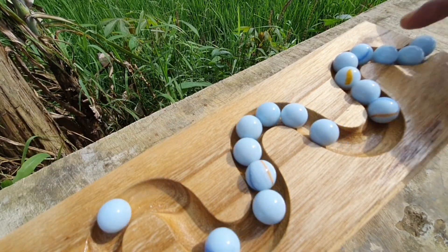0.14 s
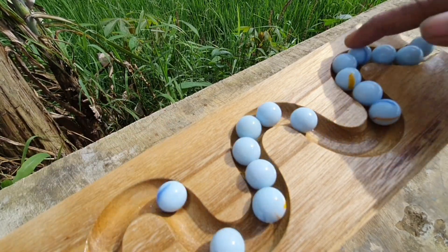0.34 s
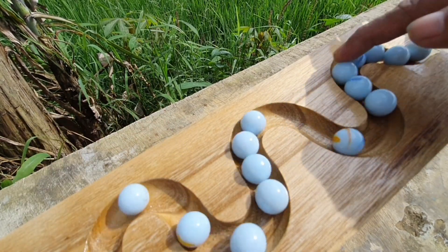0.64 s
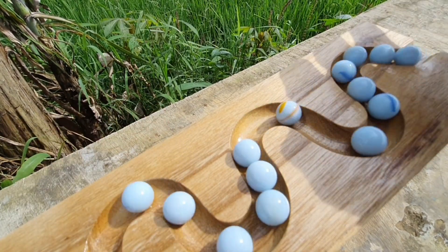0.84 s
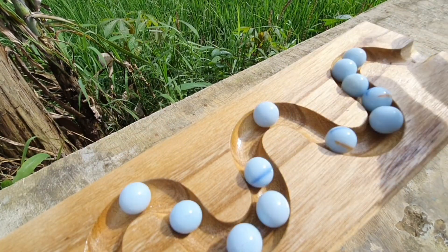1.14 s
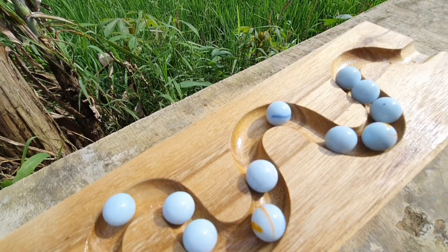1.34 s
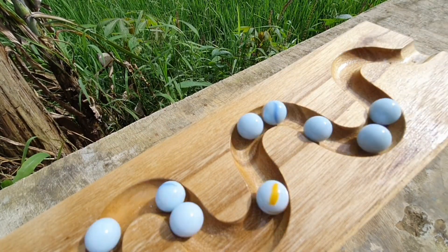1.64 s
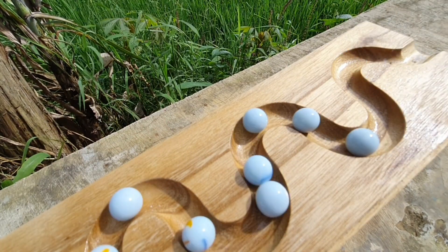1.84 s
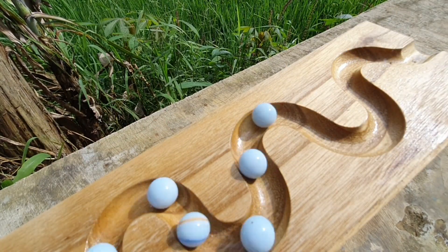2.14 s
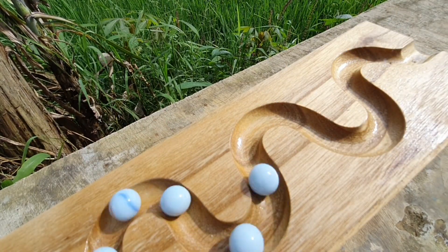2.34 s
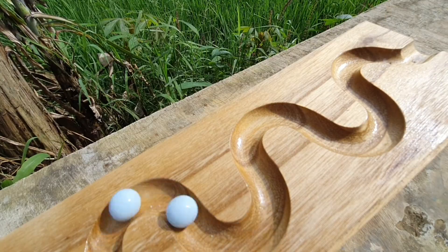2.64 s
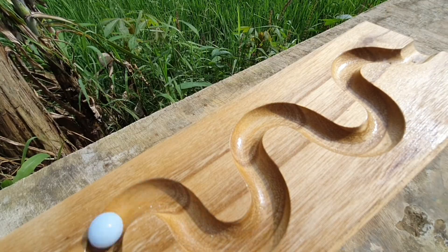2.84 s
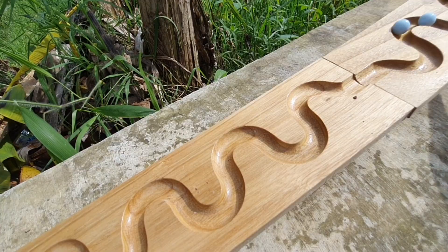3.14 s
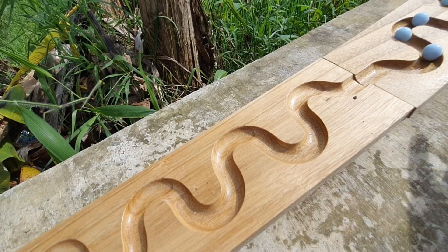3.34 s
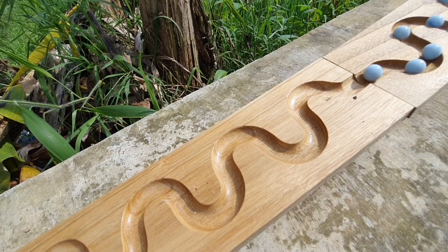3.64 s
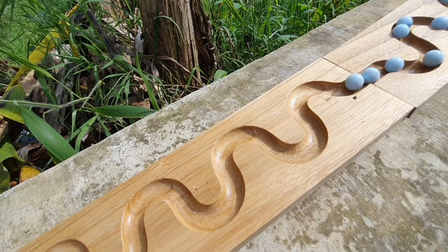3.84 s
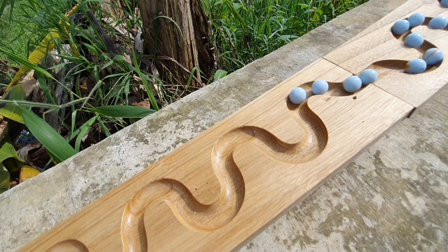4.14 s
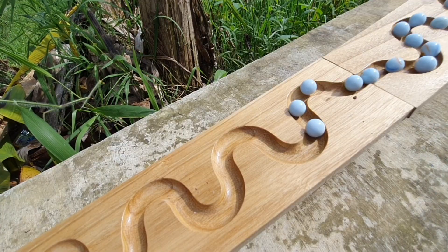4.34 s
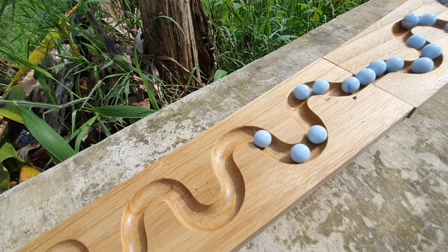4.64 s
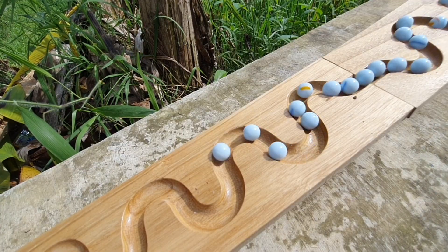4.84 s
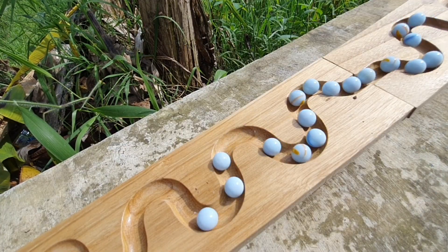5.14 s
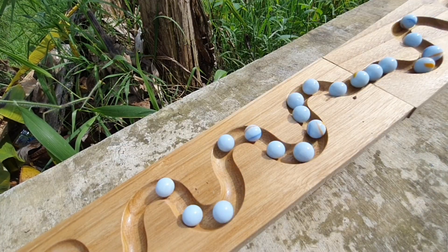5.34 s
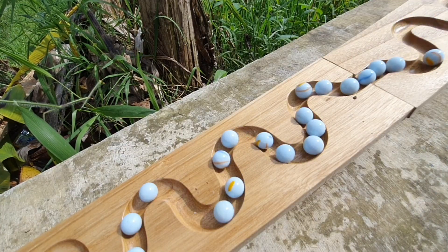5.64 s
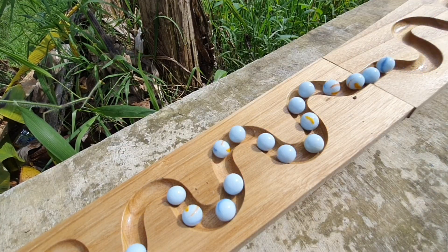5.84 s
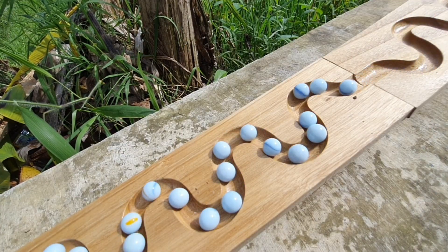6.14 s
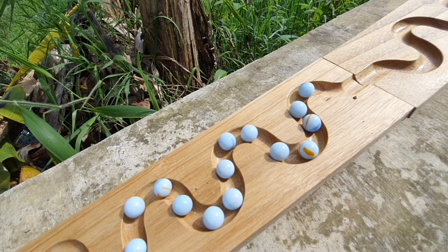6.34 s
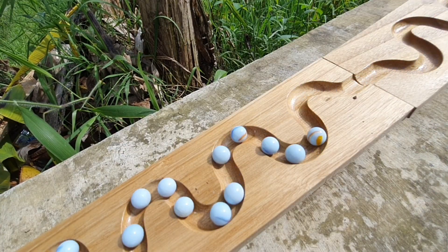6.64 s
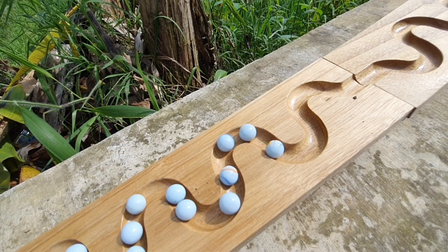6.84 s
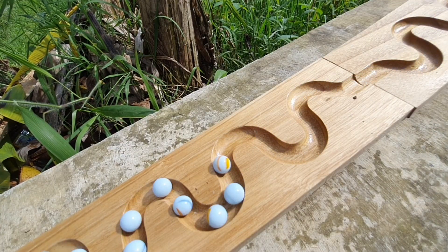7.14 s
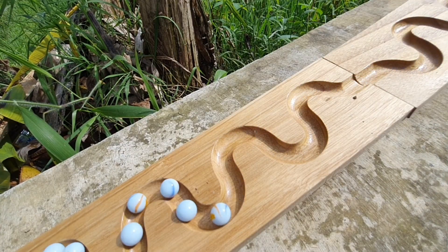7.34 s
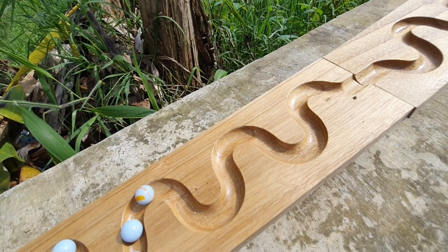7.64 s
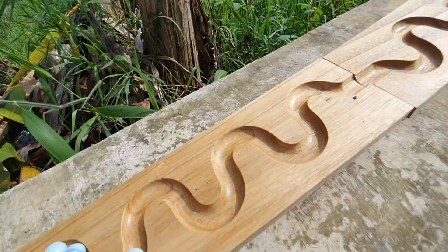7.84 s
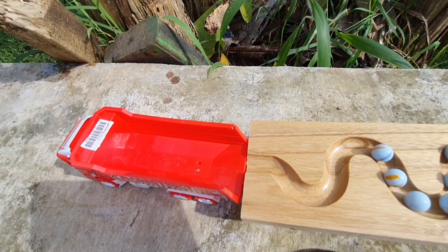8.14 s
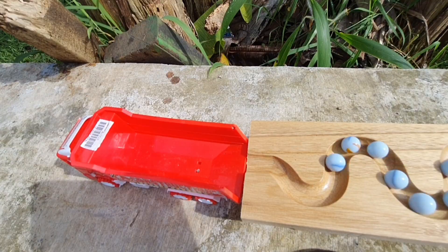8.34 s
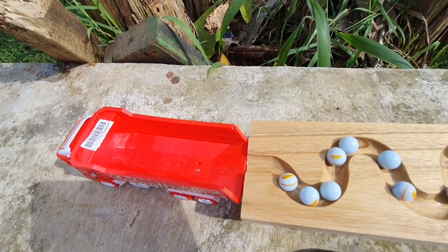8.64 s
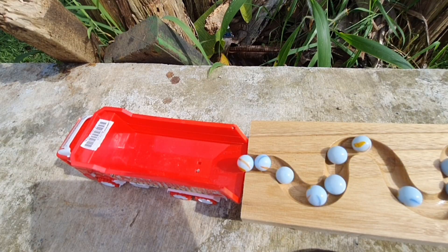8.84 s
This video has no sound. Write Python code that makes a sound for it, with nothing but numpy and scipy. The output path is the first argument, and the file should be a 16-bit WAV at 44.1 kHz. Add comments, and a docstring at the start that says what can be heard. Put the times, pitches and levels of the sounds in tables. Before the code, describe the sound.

Outdoors, low gusts buffet the microphone on the right and a thin insect song fades while glass marbles rattle along a nearby wooden track. The wind dies and the marbles carry on, knocking on the wood and clicking sharply against one another, most densely in the middle. The wooden tone changes twice as the listening position moves, starting left of centre and ending central, over faint hiss and far rumble.

```python
"""Glass marbles rattle along wood, while gusts of wind buffet the right microphone at first.
The train rolls outdoors down a winding groove in three boards laid end to end. Dense small bumps
and single knocks on the groove walls excite the boards' normal modes; glass meeting glass clicks.
The listening point moves twice. An insect sings in the first second, over far rumble and hiss."""
import sys
import numpy as np
from scipy import signal
from scipy.io import wavfile
from scipy.ndimage import uniform_filter1d

SR = 44100
rng = np.random.default_rng(int(sys.argv[2]) if len(sys.argv) > 2 else 0)


def dump(signal):
    """Clip the signal to [-1, 1] and save it as 16-bit WAV at the path in sys.argv[1]."""
    limited = np.clip(np.atleast_2d(signal).T, -1, 1)
    pcm = np.round(limited * 32767).astype(np.int16)
    wavfile.write(sys.argv[1], SR, pcm)


N = 396459
T = np.arange(N) / SR


def undb(db):
    """Amplitude ratio of a level in decibels."""
    return 10 ** (np.asarray(db) / 20)


def unit(x):
    """Normalisation to an RMS of one."""
    return x / np.sqrt(np.mean(x ** 2))


def band(x, lo_hz, hi_hz, order=2):
    """Butterworth band-pass filtering."""
    return signal.sosfilt(signal.butter(order, [lo_hz, hi_hz], "band", fs=SR, output="sos"), x)


def curve(table, **ends):
    """Linear interpolation of (time, value) rows at every sample."""
    return np.interp(T, *np.transpose(table), **ends)


def drift(rate_hz):
    """Slow random modulation: held random values, smoothed twice, with a spread near one."""
    hold = int(SR / rate_hz)
    steps = np.repeat(rng.standard_normal(N // hold + 1), hold)
    return 1.3 * uniform_filter1d(uniform_filter1d(steps, hold), hold)[:N]


def rumble(level_db=-37.5):
    """Coherence at long wavelengths: far rumble is nearly alike at both microphones."""
    mid, side = band(rng.standard_normal((2, N)), 56.2, 139.5, order=3)
    return unit(mid + 0.32 * side * np.array([[1], [-1]])) * undb(level_db) * undb(drift(2))


# Strength of the insect's song: (time [s], level [dB])
INSECT_LEVEL = [(0, -54), (.55, -54), (.95, -58)]


def insect(flicker):
    """Narrow-band noise: a thin insect song near 9 kHz."""
    song = unit(band(rng.standard_normal((2, N)), 8500, 9450))
    return song * flicker * undb(curve(INSECT_LEVEL, right=-120))


# Strength of the rolling, one list per listening point: (time [s], level [dB])
ROLLING_LEVEL = [
    [(0.0, -26.5), (0.06, -26), (0.18, -29), (0.3, -27), (1.08, -22), (1.8, -20.5), (2.9, -22), (3.08, -24)],
    [(3.1, -29), (4.15, -23.5), (4.26, -21), (4.36, -24.5), (4.74, -23), (5.0, -21.5), (5.25, -23),
     (5.38, -22), (5.81, -20.5), (6.1, -20.5), (7.0, -21), (7.99, -22.5), (8.06, -22.5)],
    [(8.08, -20.5), (8.24, -20.5), (8.3, -21), (8.52, -21), (8.75, -19), (8.99, -19.5)],
]


def rolling_db(times):
    """Level envelope of the whole train, which the hiss also follows."""
    return np.interp(times, *np.vstack(ROLLING_LEVEL).T)


# Strength of the highest band of the hiss: (time [s], level [dB])
SIZZLE_LEVEL = [(0.0, -58), (0.77, -57), (1.47, -48), (1.73, -52.5), (2.7, -55), (3.05, -52), (3.13, -59.5),
                (5.06, -54.5), (8.01, -56), (8.21, -60), (8.6, -56.5), (8.99, -58)]


def hiss(flicker, db_per_rolling_db=0.6):
    """Incoherent noise: each side has its own hiss, whose lower band swells with the rolling."""
    white = rng.standard_normal((2, N))
    treble = unit(band(white, 1240, 6850, order=3)) * undb([[-2.5], [1.5]])
    treble *= undb(-42 + db_per_rolling_db * (rolling_db(T) + 19.5))
    sizzle = unit(band(white, 8700, 13800)) * undb(curve(SIZZLE_LEVEL))
    return (treble + sizzle) * flicker


# The breeze swelling and dying: (time [s], level [dB])
BREEZE_LEVEL = [(0, -38), (.18, -44), (.3, -30), (.42, -35), (.6, -32), (.8, -27.5), (.95, -32), (1.7, -44),
                (2, -57)]
# Buffets that rise above it: (time [s], peak level [dB])
GUSTS = [(.224, -25), (.3, -24.5), (.51, -22), (.57, -26), (.68, -23), (.74, -22), (0.898, -12), (.96, -17),
         (1.055, -13.5), (1.172, -16.5), (1.328, -31), (1.432, -32), (1.73, -34)]


def wind(left_db=-9, right_db=5, rise_db_per_s=700, fall_db_per_s=332):
    """Turbulent pressure on the microphones: gusts strike fast, ebb slower, and brighten when strong."""
    level_db = curve(BREEZE_LEVEL, right=-90)
    for time, peak_db in GUSTS:
        slope = np.where(T < time, rise_db_per_s, fall_db_per_s)
        level_db = np.maximum(level_db, peak_db - slope * abs(T - time))
    noise = rng.standard_normal((2, N))
    low = unit(band(noise, 52, 114, order=3)) * undb(level_db)
    high = unit(band(noise, 142, 234)) * undb(-4 + 1.35 * level_db)
    return (low + high) * undb([[left_db], [right_db]])


# The loudest glass-on-glass contacts: (time [s], level [dB], frequency [Hz], left minus right [dB])
GLASS_CONTACTS = [(0.0478, -23, 6150, -1.5), (0.0739, -25, 7500, 8.5), (0.2972, -24.5, 7800, 15),
                  (0.3573, -30, 7900, 16), (0.404, -28, 7500, 2), (0.431, -29, 8200, 13),
                  (0.6276, -22.5, 7860, 14), (0.7713, -18, 7250, -3), (0.7816, -28, 8100, 15),
                  (0.9752, -14, 7500, 3.5), (1.0067, -21, 8150, 4), (1.0445, -27, 7000, 3),
                  (1.0615, -30, 6800, -4), (1.0948, -21, 7200, -4.5), (1.1508, -7.5, 7360, -1.5),
                  (1.1805, -26, 6000, -3), (1.1975, -16, 8400, -1.5), (1.2251, -25, 8500, -1),
                  (1.2401, -23, 8000, -10), (1.288, -26, 7460, -14), (1.3179, -23, 8000, -3.5),
                  (1.3533, -27, 8500, 2), (1.3664, -26, 7900, 23), (1.3768, -20, 8350, 3.5),
                  (1.4421, -31, 9000, -5), (1.5341, -22, 7200, -6), (1.6129, -21, 7600, 4.5),
                  (1.6531, -25, 9500, 1), (1.724, -27, 7600, 7), (1.9248, -21, 8300, 5.5),
                  (1.9709, -29, 7000, 6), (2.7617, -26, 7300, 7), (2.7886, -15.5, 8250, 17.5),
                  (2.8226, -21, 8540, 18), (3.0053, -31, 7400, 12), (3.0143, -10, 7660, 8),
                  (3.0411, -21, 8240, 16), (3.0558, -30, 7500, 5), (3.3424, -26, 6050, -10),
                  (3.3527, -28, 7200, 0), (3.7201, -19, 6950, -6), (3.9173, -15, 8100, 6.5),
                  (4.0383, -17, 7800, 6.5), (4.0771, -24, 7000, -4), (4.1987, -13.5, 8200, 1),
                  (4.4783, -20, 6800, 3), (4.5253, -7, 7560, 6.5), (4.6034, -18, 7660, 0),
                  (4.6334, -16.5, 7300, 4.5), (4.7162, -15, 7850, 2.5), (4.7524, -17, 8050, 3),
                  (4.7835, -27, 7500, 8), (4.8038, -10, 8000, 3.5), (4.829, -9, 8200, -2.5),
                  (4.8374, -23, 7800, -2), (4.8791, -14, 7900, 1), (4.9231, -15.5, 7250, 11.5),
                  (4.9305, -26, 7000, -1), (4.9789, -20, 7500, 0.5), (4.998, -19, 8400, 0),
                  (5.0226, -20, 7800, 9), (5.0321, -23.5, 7800, 3), (5.0404, -21, 8100, 4.5),
                  (5.1141, -18, 7500, 1.5), (5.1211, -22, 6900, -4), (5.1374, -27, 7600, 14),
                  (5.3146, -9.5, 7770, 5.5), (5.3412, -15, 7600, -3.5), (5.3483, -19, 7550, 8),
                  (5.3841, -20, 7800, 3), (5.3955, -11, 7900, 4), (5.4132, -28, 8100, 7),
                  (5.5142, -25, 8000, -4), (5.5202, -13, 7660, 1.5), (5.5667, -15, 8200, 2),
                  (5.5906, -19, 8000, 2), (5.6114, -12, 7600, -1.5), (5.6386, -29, 8500, 2),
                  (5.6623, -11.5, 8400, 0.5), (5.7382, -13, 7800, -2.5), (5.7473, -6, 7470, 1),
                  (5.7671, -18, 6600, 0.5), (5.8172, -27, 7000, 2), (5.8451, -12, 7350, 2.5),
                  (5.9718, -31, 8500, 4.5), (5.9911, -9.5, 7450, 7.5), (5.9983, -20, 6800, 0),
                  (6.0561, -25, 7000, 2), (6.2344, -24, 7400, 6), (6.2701, -24, 7500, 4.5),
                  (6.2925, -26, 7760, 15), (6.4187, -29, 7900, 15), (6.4772, -19, 8400, 11.5),
                  (6.5875, -16.5, 7950, 14), (6.7336, -21, 8250, 7), (6.9797, -27, 8750, 14),
                  (6.9858, -18, 7260, -1.5), (7.0314, -30, 6900, 6), (7.2686, -32, 6700, 7),
                  (7.3501, -23, 7400, 15), (7.4237, -27, 7700, 10), (7.4985, -20.5, 8300, 17),
                  (7.5663, -22, 8200, 12), (7.5772, -25, 8200, 4), (7.5835, -6, 8440, 13.5),
                  (7.6217, -26, 8350, 21), (7.6641, -19, 8400, 13.5), (7.7588, -35, 9500, 10),
                  (7.7754, -5, 9830, 10), (7.787, -25, 8100, 14), (7.793, -28, 8700, 9),
                  (7.8024, -26, 8100, 12), (7.8385, -25, 6800, 8), (7.8662, -10, 8900, 13),
                  (7.8851, -20, 8300, 17), (7.8984, -22, 8650, 17), (7.9125, -28, 8900, 14),
                  (7.9836, -9.5, 9000, 17), (8.0327, -8.5, 9540, 8.5), (8.042, -26, 8300, 5),
                  (8.0465, -22, 8300, 8.5), (8.0577, -26, 8600, 26), (8.0757, -21, 7900, 19),
                  (8.0827, -25, 8300, 16), (8.1115, -21, 8700, 14), (8.1913, -31, 8000, -2.5),
                  (8.4397, -33, 7500, 2), (8.6527, -31, 8000, -1), (8.6767, -25, 8040, 1.5),
                  (8.7277, -22, 8100, -7.5), (8.8188, -31, 7600, 13), (8.8667, -31, 7500, -2.5),
                  (8.9407, -23, 7000, 9), (8.9651, -14.5, 8000, 5.5)]


def clicks(faint_count=320, rise_s=0.00095, echo_s=0.00059, tail_s=0.0052, edge_hz=12500,
           lag_s_per_db=0.00003):
    """Hertzian contact: a harder hit gives a shorter pulse, which the wood reflects and scatters."""
    out, t = np.zeros((2, N + 1000)), np.arange(800) / SR
    when, strength, pitch, pan = rng.random((faint_count, 4)).T
    faint = np.c_[when * N / SR, -43 + 12 * strength, 6000 + 3000 * pitch, 14 * pan - 3]
    tail = undb(-10) * np.minimum(t / rise_s, 1) ** 2 * np.exp(-t / tail_s)
    for time, db, hz, pan_db in np.vstack([GLASS_CONTACTS, faint]):
        # harder clicks, and those from the left, keep more of their top edge
        edge = undb(-13.5 + 0.3 * pan_db + 0.27 * (db + 12))
        width_s = 0.000086 * undb(-0.1 * (db + 8.5))
        direct = np.exp(-.5 * ((t - rise_s) / width_s) ** 2)
        echo = undb(-4) * np.exp(-.5 * ((t - rise_s - echo_s) / width_s) ** 2)
        for side, sign in enumerate((1, -1)):
            phase = 2 * np.pi * rng.random(2)
            tone = np.cos(2 * np.pi * hz * t + phase[0])
            tone += edge * np.cos(2 * np.pi * edge_hz * t + phase[1])
            tick = (direct + echo) * tone
            tick += tail * band(rng.standard_normal(len(t)), hz * 0.32, min(hz * 1.1, 17000.))
            tick += tail * undb(-3) * band(rng.standard_normal(len(t)), hz * 1.01, hz * 1.07)
            # a click from the left reaches the right microphone later
            start = max(int((time + side * lag_s_per_db * pan_db) * SR), 0)
            out[side, start:start + len(t)] += undb(db + sign * pan_db / 2) * tick
    return out[:, :N]


def bumps(rate_hz=2200, scatter_db=3.0, surge_db=2.0):
    """Poisson process: sample positions and sizes of rolling bumps, which surge in the bends."""
    at = np.flatnonzero(rng.random(N) < rate_hz / SR)
    return at, undb(scatter_db * rng.exponential(size=len(at)) + surge_db * drift(20)[at])


# The loudest hits on the groove wall, by the peak they give each group of modes:
# (time of full swing [s], upper level [dB], middle level [dB], lower level [dB])
WALL_HITS = [(0.0266, -31, -28.0, -21.0), (0.0493, -30, -21, -21), (0.0654, -35.0, -24, -16),
             (0.1436, -35.5, -24, -19), (0.1946, -41, -24.5, -26.5), (0.2132, -28, -19, -22.0),
             (0.2715, -32, -25.0, -26), (0.2941, -36, -30, -17), (0.3066, -34, -16, -13),
             (0.3163, -38.5, -23.0, -24), (0.3376, -32.0, -23, -17), (0.3498, -15.5, -14.5, -14),
             (0.3929, -29, -13, -14), (0.4063, -31, -21, -28.5), (0.4158, -27.0, -29, -16),
             (0.4524, -28, -24, -15), (0.5319, -27.5, -17, -18), (0.5892, -29, -25.0, -22),
             (0.6529, -28, -20, -18), (0.7133, -27, -15, -13), (0.7659, -29.5, -16, -18),
             (0.8273, -33, -19, -19), (0.8429, -26, -12, -10), (0.9368, -25, -19, -14),
             (0.95, -40.5, -18, -8), (1.0185, -31, -29, -33), (1.0407, -35.5, -32, -26),
             (1.0785, -24, -21.5, -23.5), (1.1291, -34, -27, -16), (1.1398, -29, -17.5, -16.5),
             (1.1815, -31, -24, -20.5), (1.2337, -22, -27, -21), (1.2608, -17, -17, -16),
             (1.3053, -27.0, -15, -28), (1.3194, -20, -14, -26), (1.3474, -33.0, -13, -27),
             (1.5209, -35.5, -16, -29), (1.554, -27, -27, -27), (1.5645, -25, -23.0, -13),
             (1.574, -31, -17, -17.0), (1.5993, -18, -22, -14.0), (1.6738, -15, -19, -15),
             (1.8044, -19, -19, -19), (1.8886, -18, -18, -24), (1.9202, -23, -21, -24.5),
             (1.9361, -17, -20, -28), (2.0823, -30.5, -16.0, -25.0), (2.1023, -27, -18.0, -14.0),
             (2.1263, -20, -13.5, -10), (2.2167, -19, -22, -13), (2.2324, -29, -27, -21),
             (2.2709, -22.5, -28, -25), (2.3309, -17, -16.5, -14), (2.3954, -16, -23, -28),
             (2.4884, -18, -13, -19.5), (2.5218, -18, -14, -10), (2.5473, -20, -10, -28),
             (2.5654, -13, -12, -14), (2.5802, -19, -24, -13), (2.6789, -26, -28, -28),
             (2.6928, -29, -24, -33), (2.7327, -27.0, -18, -22), (2.8352, -19, -17, -23.5),
             (2.8534, -24.0, -26, -12), (2.8779, -29, -19, -15), (2.9089, -23, -17, -15),
             (2.9807, -26, -19, -13), (3.004, -16.5, -16, -19), (3.0567, -24.5, -27, -15),
             (3.0883, -18, -19, -27), (3.102, -29, -25.5, -25.0), (3.2547, -35, -30.0, -29),
             (3.2652, -25.0, -26.0, -30), (3.2807, -25, -17, -17), (3.2964, -29, -28, -14),
             (3.3144, -27.0, -18, -23), (3.3439, -19, -23, -26), (3.3534, -23, -25, -13),
             (3.4011, -26.5, -30, -27), (3.4205, -27.5, -29.0, -30.5), (3.5208, -36, -30.0, -33),
             (3.5936, -29, -31, -30.0), (3.6667, -23, -25, -12), (3.7637, -17.5, -11, -6),
             (3.7906, -21, -9, -10), (3.8024, -30, -18, -15), (3.9526, -20, -29.0, -24),
             (4.0801, -24, -18, -15), (4.2373, -18.5, -18, -12), (4.2557, -20, -19, -17),
             (4.3, -25, -17, -20), (4.4235, -22, -15, -13), (4.4473, -23, -20, -20), (4.483, -16, -12, -22),
             (4.5425, -34, -31, -12), (4.5729, -16.5, -23.5, -26), (4.6574, -37.0, -32, -11),
             (4.7697, -33, -30, -9), (4.8057, -27, -23, -14), (4.8247, -27.0, -19.5, -9),
             (4.8381, -15.5, -19, -7), (4.8513, -28.0, -23.5, -15), (4.9123, -28.5, -20, -16),
             (4.9312, -19, -25, -15), (4.9611, -18.0, -18.5, -9.5), (5.031, -20, -28, -13),
             (5.0733, -17, -16.5, -13), (5.1318, -24, -20, -18.5), (5.1781, -33, -25, -11),
             (5.2009, -32, -20, -17), (5.2181, -23, -27, -12), (5.2376, -36.0, -25, -14),
             (5.2978, -23, -35, -25.5), (5.4117, -28.0, -32, -16), (5.4298, -28, -24, -14),
             (5.4493, -33, -25, -22), (5.5166, -19, -21, -20), (5.5422, -27, -30, -20),
             (5.594, -27, -30, -18), (5.6429, -20, -20, -25), (5.6546, -27, -19, -24),
             (5.6765, -21, -25, -19), (5.7242, -34, -28, -23), (5.7388, -36, -27, -18),
             (5.7685, -22, -14.5, -8), (5.796, -18.5, -23, -16), (5.8198, -30, -26, -21),
             (5.8328, -30, -28, -27), (5.8444, -21, -17.0, -21), (5.8749, -22.5, -14.5, -21),
             (5.9298, -24, -29.5, -21), (5.9794, -24, -19, -18.0), (6.0128, -32, -25, -15),
             (6.1105, -29, -23, -25), (6.1252, -29.0, -24, -24), (6.138, -21, -25, -18),
             (6.1473, -27, -21, -20), (6.1598, -19, -15, -13), (6.1725, -18, -15.5, -14.5),
             (6.242, -22, -19, -15.0), (6.2716, -23.5, -16, -18), (6.3447, -31, -20, -23),
             (6.3817, -26, -18, -17), (6.4022, -24, -26, -21), (6.4197, -24, -28.5, -21),
             (6.5371, -27, -19, -26), (6.5902, -5.5, -11, -18), (6.6028, -18, -16, -18.0),
             (6.6303, -21, -17.0, -11), (6.6647, -21, -18, -12), (6.6769, -20, -16, -9),
             (6.7779, -21.5, -24, -22.5), (6.808, -23, -29.0, -9), (6.8198, -23, -16, -25.5),
             (6.9528, -28, -19.0, -16.5), (6.969, -26, -19, -24), (6.988, -23, -15.0, -11),
             (7.0341, -10, -14, -14.5), (7.0489, -19, -18.5, -9), (7.0583, -29.0, -18, -18),
             (7.1192, -16, -13, -18.5), (7.1245, -21, -12, -14), (7.1396, -21, -17, -11),
             (7.2101, -20, -19.0, -18), (7.2349, -18.5, -20, -7), (7.2703, -12, -16, -9),
             (7.3465, -18, -18, -22), (7.352, -9.5, -18.0, -18.0), (7.4145, -22, -25, -19),
             (7.4242, -21, -16.5, -13), (7.4395, -20, -21, -20), (7.5851, -24.5, -14, -15),
             (7.6103, -19, -18, -12), (7.6469, -22, -22, -27), (7.6575, -23, -26.5, -26.0),
             (7.6744, -26, -20, -19), (7.7794, -27, -19, -17), (7.8452, -34.5, -19, -10),
             (7.865, -11, -11.5, -10), (7.8855, -22, -18, -9), (7.9016, -23, -24, -19.5),
             (7.9365, -15, -17, -10), (8.0008, -21, -20, -26), (8.0406, -15.5, -16, -19),
             (8.0556, -18, -22, -21), (8.1098, -18, -10, -26), (8.124, -25, -19, -20.5),
             (8.2113, -26, -13, -13), (8.2255, -18, -17, -13), (8.2397, -13, -14, -14),
             (8.2465, -27, -16, -11), (8.4044, -33.5, -17, -12), (8.4263, -28.0, -16, -20),
             (8.4423, -25.0, -20, -10), (8.6121, -26.5, -22, -15), (8.6242, -25, -16.5, -12),
             (8.6648, -22, -23, -24), (8.869, -9, -11.0, -14), (8.8801, -26.0, -18.5, -21),
             (8.8956, -26, -15, -18), (8.9167, -28.5, -12, -14), (8.9264, -29.0, -15, -19),
             (8.942, -25.0, -23, -12)]


def knocks(small_count=60, scatter_db=5):
    """Impulsive excitation: the loud wall hits, plus random small ones that scale with the rolling."""
    chance = rng.random((small_count, 4))
    times = chance[:, :1] * (N - 2) / SR
    small = np.c_[times, rolling_db(times) + [-16, -10, -7] + scatter_db * chance[:, 1:]]
    return np.vstack([WALL_HITS, small])


def modal_impulses(modes, group_db, build_hz, damping_hz, contact_hz=2600, uneven_db=3, phase_rad=0.76):
    """Modal excitation: a knock feeds most the modes near its contact pitch, slightly out of step."""
    hz, width_hz, left_db, right_db = np.transpose(modes)[:, :, None]
    shape = (len(group_db[0]), len(modes))
    drive = undb(-3 * np.log2(hz / contact_hz) ** 2 + uneven_db * rng.standard_normal(shape).T)
    damped_hz = width_hz + damping_hz
    # peak of each mode's impulse response
    crest = np.pi * damped_hz / SR * (damped_hz / build_hz) ** (damped_hz / (build_hz - damped_hz + 1e-3))
    swing = drive * crest * np.hypot(undb(left_db), undb(right_db)) / 2
    # upper, middle and lower modes each share out their group's level
    groups = [hz > 2800, (hz <= 2800) & (hz > 1930), hz <= 1930]
    drive *= sum(group * undb(db) / np.sqrt((group * swing ** 2).sum(0))
                 for group, db in zip(groups, group_db))
    return drive * np.exp(1j * phase_rad * rng.standard_normal(shape).T)


def resonate(force, hz, width_hz, build_hz=1100):
    """Damped resonance: one complex mode of unit centre gain; a second pole makes it build up."""
    radii = np.exp(-np.pi * np.array([width_hz, build_hz]) / SR)
    return signal.lfilter([np.prod(1 - radii)], np.poly(radii * np.exp(2j * np.pi * hz / SR)), force)


# Normal modes in five stages: top board close by (train at its far end), top board close by,
# top board from further down, middle board, bottom board.
# (frequency [Hz], bandwidth [Hz], left level [dB], right level [dB])
BOARD_MODES = [
    [(236, 160, -9, -21), (575, 160, -9.5, -19), (750, 200, -3.5, -7), (997, 165, -4, -4.5),
     (1160, 90, -4.5, -0.5), (1430, 260, -8.5, -8), (1652, 23, 0, -3), (1800, 53, -1, -6),
     (2030, 220, -11.5, -15), (2355, 31, -11, -11), (2580, 560, -17.5, -23), (3160, 130, -15, -25),
     (3700, 170, -20, -22.5), (4950, 180, -24.5, -34)],
    [(235, 67, -6, -20), (603, 112, -6.5, -16), (690, 160, -6.5, -9), (940, 210, -9.5, -12.5),
     (1079, 62, 2.5, -2), (1330, 250, -9, -11), (1662, 38, 2, 1.5), (1806, 56, -5, -14),
     (1835, 160, -10, -7.5), (2314, 104, -2.5, -9), (2530, 320, -15.5, -19), (3083, 80, -10, -16),
     (3243, 48, -12, -16), (3110, 500, -22.5, -39), (3800, 180, -19, -22), (4770, 190, -22.5, -36),
     (5020, 60, -25, -36), (2080, 100, -11, -25), (2870, 40, -13, -21), (3540, 70, -19, -39),
     (3970, 80, -31, -20), (5670, 300, -31, -26)],
    [(223, 63, -20.5, -14), (576, 76, -20, -13.5), (800, 300, -16.5, -11.5), (1103, 77, -6.5, -5.5),
     (1326, 25, -6.5, -2), (1450, 170, -10, -9.5), (1628, 25, 2.5, 1.5), (1928, 340, -20, -8.5),
     (2284, 51, -4, -2), (2610, 77, -21, -18), (2800, 220, -24, -18.5), (3040, 65, -32, -10.5),
     (3224, 34, -21, -16), (3777, 130, -30, -14.5), (4650, 160, -39, -22.5), (3570, 100, -28, -30),
     (3970, 180, -30.5, -28), (5380, 73, -47, -33)],
    [(210, 81, -11.5, -14.5), (606, 144, -7.5, -7), (823, 155, -3.5, -4), (1042, 250, -1.5, -6.5),
     (1325, 100, 5.5, -4.5), (1600, 740, -11.5, -3), (1706, 300, -2.5, -2.5), (2340, 26, 1, 2.5),
     (2570, 154, -6.5, -1.5), (2130, 105, -5, -7), (3240, 61, -14.5, -2), (3364, 68, -6, -10.5),
     (4030, 220, -18, -36), (5150, 100, -18.5, -37), (6240, 150, -28, -21), (1620, 39, 0.5, 1),
     (1820, 60, -3, 1), (3640, 160, -20.5, -20), (4540, 180, -23, -14.5)],
    [(220, 98, -17.5, -13.5), (620, 330, -14.5, -12.5), (890, 220, -11.5, -3.5), (1065, 110, -4.5, -3),
     (1328, 37, -9, 6.5), (1670, 110, 2, 2), (2100, 380, -8, -9.5), (2573, 55, -1, -10),
     (3160, 89, -10, -14), (3870, 200, -32.5, -18), (4240, 120, -31, -13.5), (4480, 150, -30, -18),
     (5180, 110, -26, -17), (6170, 330, -35, -37), (1180, 88, -7, -16), (2370, 60, -5, -10),
     (3540, 60, -24, -25)],
]
# Phase of those modes, one list per stage: (lead of the right microphone [rad])
PHASE_LEADS = [
    [0, -.3, -.5, -.8, 2.8, 3, 2, 1, 1, -.9, .8, -1.8, -3, 2.8],
    [0, -.3, -.5, -.8, 2.8, 3, 2, 1.5, 1, -.9, .8, -1.8, -1.8, -1, -3, 2.8, 2.8, 0, -.5, -2.5, 3, 2],
    [-.1, .3, .7, 2, 2.1, 2.6, -2.9, 3, -2.4, -1.3, -.2, -1.6, -1.1, -.4, 1, -.8, 0, 1.5],
    [0, .1, -.3, -1.6, -.6, -2, 2.1, .3, .1, 1.6, -.8, -1.1, 2.3, 3, 1.8, -2, 2.1, 0, 2.6],
    [0, .6, 1.2, 2, 1, -1.1, -.5, .7, 2.7, 0, 1.4, 1.4, -1.8, 0, 1.5, 0, 1.5],
]
# Build-up of a knock in each stage: (time to full swing [s], bandwidth of the second pole [Hz])
KNOCK_BUILDS = [(0.001417, 640), (0.001597, 550), (0.001643, 320), (0.00199, 410), (0.00138, 420)]
# Swell and fade of the hollow ring near 1640 Hz as the train leaves the top board: (time [s], gain [dB])
HOLLOW_GAIN = [(3.1, 0), (3.4, 3), (3.85, 0), (4.05, -6), (4.4, -4), (4.75, -5), (5.2, 1), (5.8, 0)]


def board(stage, share, gain, bump_at, bump_size, hits, coherence=0.85, damping_hz=50):
    """Modal superposition: bumps and knocks land all over a board, ringing each mode by chance amounts."""
    modes, (build_s, build_hz) = BOARD_MODES[stage], KNOCK_BUILDS[stage]
    active = np.flatnonzero(share > 0)
    start, end = active[0], min(active[-1] + 2000, N)
    length = end - start
    rolling, knocking = np.zeros((2, 2, length))
    here = (bump_at >= start) & (bump_at < end)
    times, *group_db = np.array([hit for hit in hits if start <= hit[0] * SR < end - 1]).T
    struck = np.maximum((times - build_s) * SR, start).astype(int)
    impulses = share[struck] * modal_impulses(modes, group_db, build_hz, damping_hz)
    for (hz, width_hz, left_db, right_db), lead, impulse in zip(modes, PHASE_LEADS[stage], impulses):
        force, blows = np.zeros((2, length)), np.zeros(length, complex)
        # low modes feel the even weight of the train, high ones the single bumps
        sizes = bump_size[here] ** min(hz / 3000, 1)
        force[:, bump_at[here] - start] = sizes * rng.standard_normal((2, here.sum()))
        force /= force.std()
        # the microphones face different parts of the board, so they agree less on higher modes
        correlation = coherence ** (hz / 1500)
        force[1] = correlation * force[0] + np.sqrt(1 - correlation ** 2) * force[1]
        # each mode waxes and wanes as the marbles pass its antinodes and nodes
        is_hollow = 1600 < hz < 1670 and width_hz < 100
        force *= undb(0.3 * drift(4) + is_hollow * curve(HOLLOW_GAIN))[start:end]
        pickup = (undb([left_db, right_db]) * np.exp(1j * np.array([0, lead])))[:, None]
        rolling += (pickup * resonate(force, hz, width_hz)).imag
        # a knocking marble leans on the wall for a moment: the swing builds slowly and dies sooner
        blows[struck - start] = impulse
        knocking += (pickup * resonate(blows, hz, width_hz + damping_hz, build_hz)).imag
    rolling = band(rolling, 300, 6000, order=1)
    rolling *= (gain * share)[start:end] / rolling.mean(0).std()
    out = np.zeros((2, N))
    out[:, start:end] = rolling + band(knocking, 300, 17000, order=1)
    return out


# Progress of the train; fractions blend two stages: (time [s], stage [index into BOARD_MODES])
TRAIN_STAGE = [(0.7, 0), (1.3, 1), (3.085, 1), (3.095, 2), (3.85, 2), (4.3, 2), (4.8, 2.5), (5.5, 3),
               (6.3, 3), (8.05, 3), (8.09, 3.5), (8.99, 4)]
# Balance of the boards at each listening point: (start time [s], left minus right [dB])
BOARD_BALANCE = [(0, 6.5), (3.09, 5.5), (8.07, 0.5)]


def marbles(grit_db=-30):
    """Structure-borne and direct sound: the train rings each board in turn; bumps also tick in the air."""
    position, gain = curve(TRAIN_STAGE), undb(rolling_db(T))
    bump_at, bump_size = bumps()
    hits = knocks()
    ticks = np.zeros((2, N))
    ticks[:, bump_at] = bump_size * rng.standard_normal((2, len(bump_at)))
    out = unit(band(ticks, 3400, 7700)) * undb(grit_db) * gain
    for stage in range(len(BOARD_MODES)):
        share = np.sqrt(np.clip(1 - abs(position - stage), 0, 1))  # equal-power crossfade
        out += board(stage, share, gain, bump_at, bump_size, hits)
    starts, balance_db = np.transpose(BOARD_BALANCE)
    pan_db = balance_db[np.searchsorted(starts[1:], T)]
    return out * undb(pan_db * np.array([[.5], [-.5]]))


def scene():
    """Linear superposition of all sources; the hiss and the insect flicker together."""
    mix = marbles() + clicks() + wind() + rumble()
    flicker = undb(1.2 * drift(8))
    return mix + hiss(flicker) + insect(flicker)


def record(dry, cutoff_hz=16300):
    """Soft saturation rounds the loudest peaks, and a steep low-pass filter cuts the top."""
    lowpass = signal.ellip(8, .2, 70, cutoff_hz, fs=SR, output="sos")
    return signal.sosfilt(lowpass, np.tanh(0.82 * dry) / 0.85)


dry = scene()
out = record(dry)
dump(out)
```